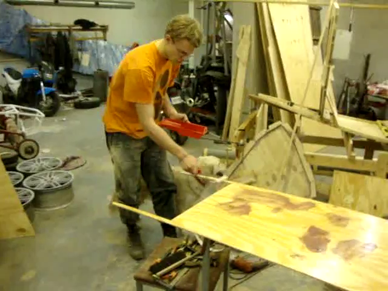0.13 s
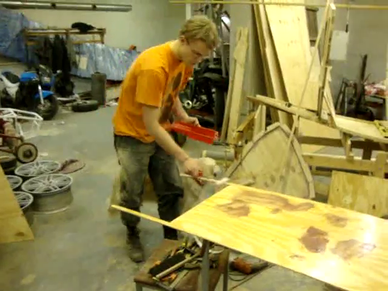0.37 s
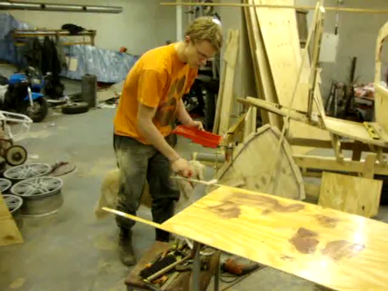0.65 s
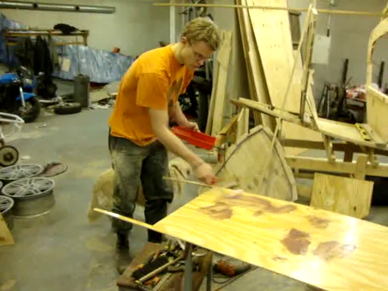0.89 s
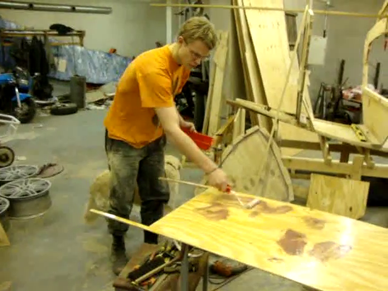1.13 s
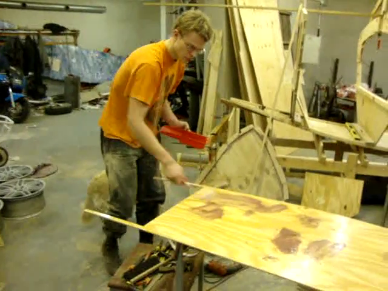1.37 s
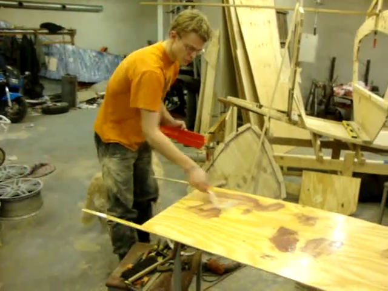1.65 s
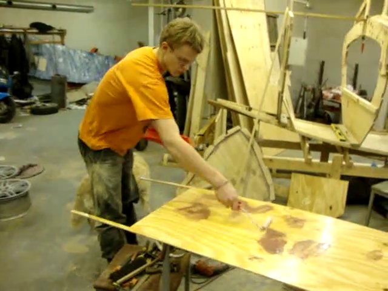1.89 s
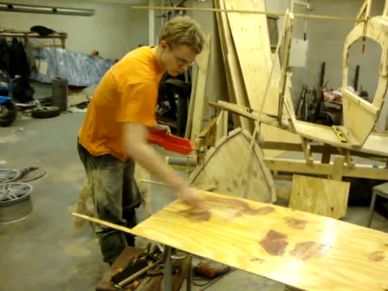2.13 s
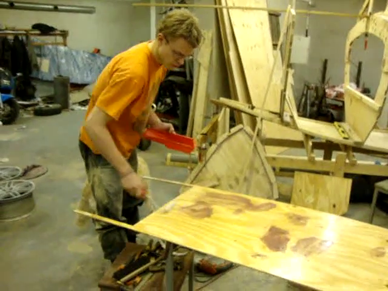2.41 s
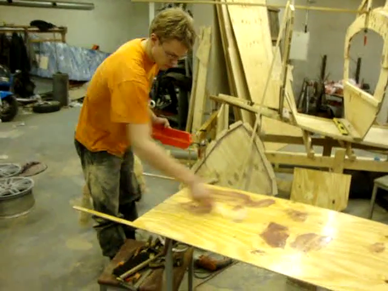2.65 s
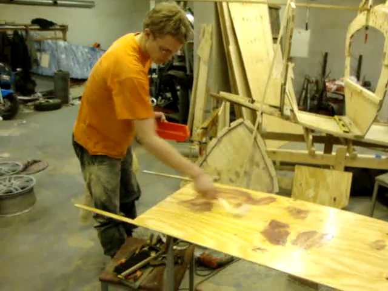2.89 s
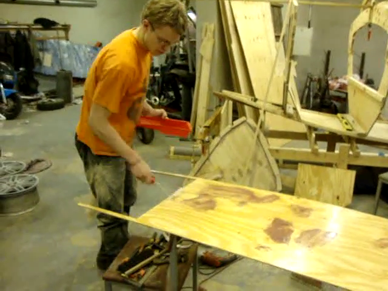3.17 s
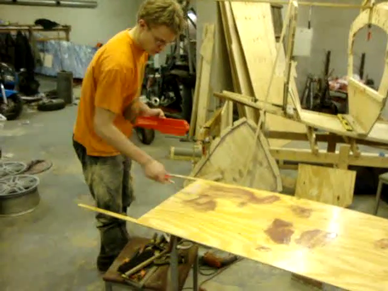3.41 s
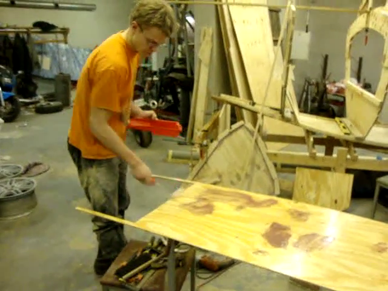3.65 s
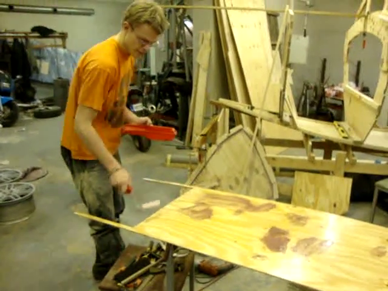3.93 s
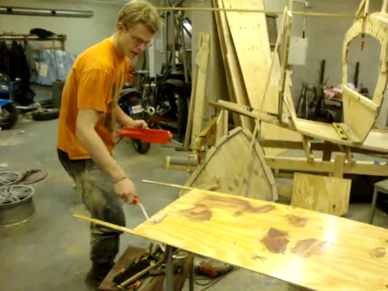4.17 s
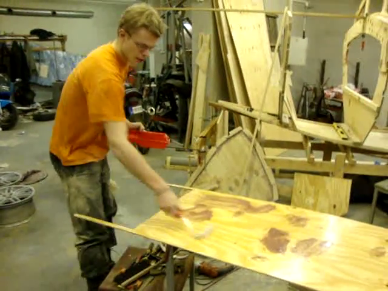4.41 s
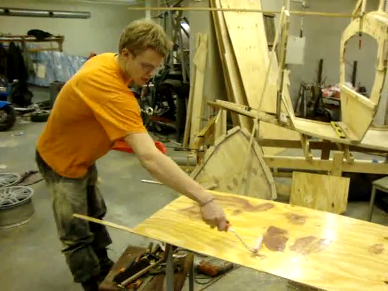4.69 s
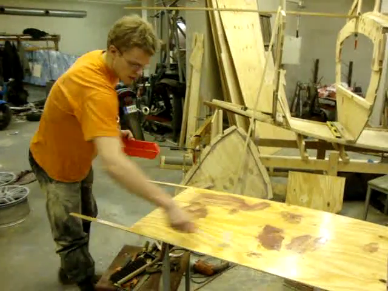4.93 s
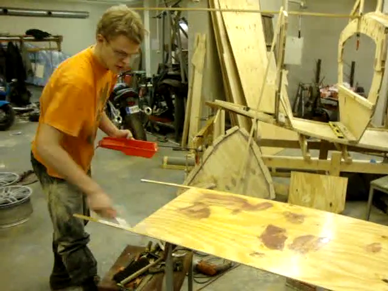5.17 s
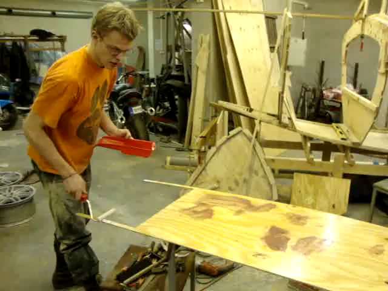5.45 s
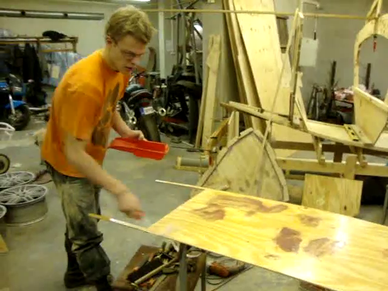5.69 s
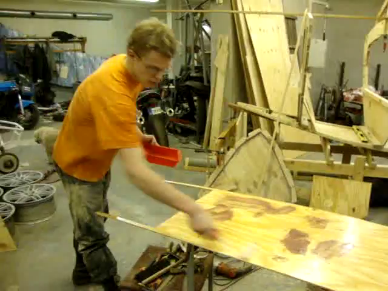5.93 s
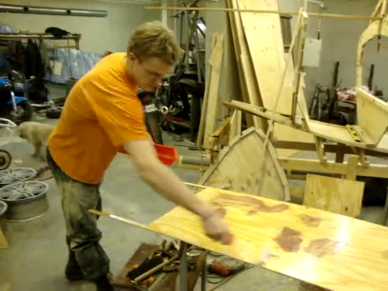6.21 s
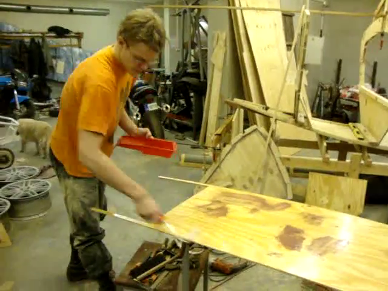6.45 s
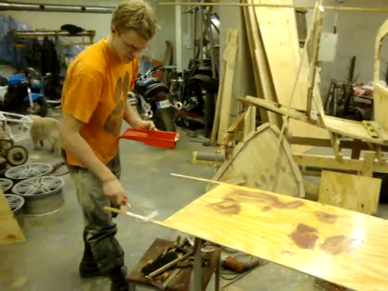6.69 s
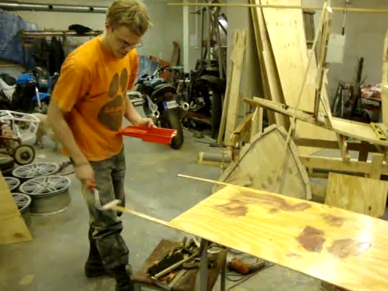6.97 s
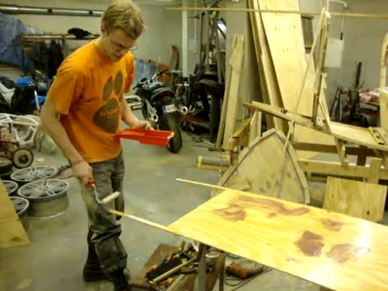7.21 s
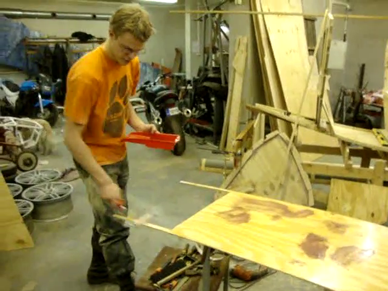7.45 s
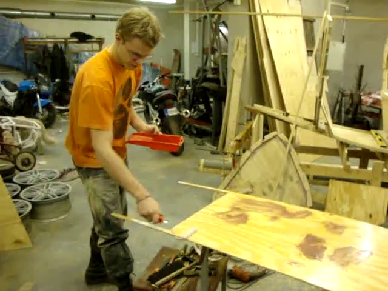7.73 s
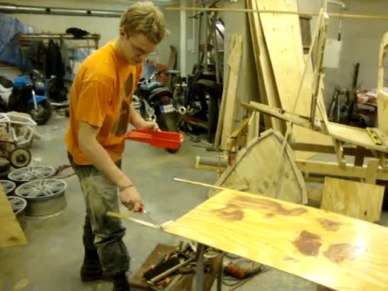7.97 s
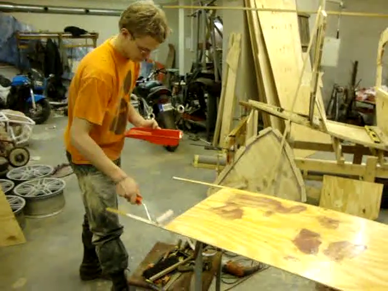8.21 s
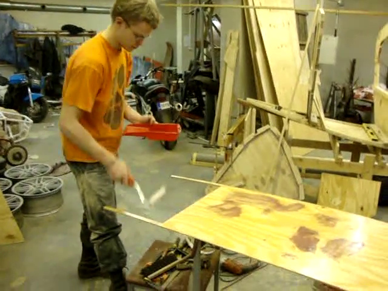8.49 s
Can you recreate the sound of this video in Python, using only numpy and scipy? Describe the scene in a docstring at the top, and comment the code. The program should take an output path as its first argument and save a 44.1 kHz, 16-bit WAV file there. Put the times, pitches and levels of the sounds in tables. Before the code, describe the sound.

A handheld microphone a few steps away picks up a tacky roller on a resonant wooden panel: arching swishes of fine sticky crackle, nap scuffing, and hollow board rumble. Clicks open the scene, a bouncing knock interrupts halfway, and soft knocks and a brief rattle follow. Near the end come a longer rattle, weak strokes, heavy double knocks and a low trestle shudder in the echoing hall.

```python
"""A small paint roller spreads sticky epoxy over a plywood panel in a large workshop, over steady room noise.
Two hard clicks come first; then strokes grow stronger: the nap hisses out of the resin, the panel rumbles.
A knock booms and bounces halfway, then more strokes follow among soft knocks, clicks and a rattle.
Late on a longer rattle sounds, the strokes weaken, and heavy knocks with clicks leave a low shudder.
Shaped noise makes strokes and room, ringing modes the knocks, short sines the clicks; the hall answers them."""
import sys
import numpy as np
from scipy import signal
from scipy.fft import rfft, irfft, next_fast_len
from scipy.io import wavfile
from scipy.ndimage import uniform_filter1d, map_coordinates

SR = 44100
rng = np.random.default_rng(int(sys.argv[2]) if len(sys.argv) > 2 else 0)


def transcribe(signal):
    """Save signal, clipped to [-1, 1], as a 16-bit WAV file at the path in sys.argv[1]."""
    frames = np.atleast_2d(signal).T
    limited = np.clip(frames, -1, 1)
    pcm = np.round(limited * 32767).astype(np.int16)
    wavfile.write(sys.argv[1], SR, pcm)


def to_linear_factor(level_db):
    """Convert decibel levels (scalar or array-like) to linear amplitude factors."""
    exponent = np.asarray(level_db, float) / 20
    return 10 ** exponent


N = 379260  # length in samples


def unit(x):
    """Scales a sound to rms 1."""
    return x / np.sqrt(np.mean(x ** 2) + 1e-20)


def along(points, hz):
    """Reads a curve of (Hz, value) points on a log frequency axis."""
    f, v = np.transpose(points)
    return np.interp(np.log(hz + 1), np.log(f + 1), v)


def filtered(x, response):
    """Multiplies the spectrum of x by a response, a function of frequency in Hz."""
    m = next_fast_len(len(x) + 8192)
    hz = np.fft.rfftfreq(m, 1 / SR)
    return irfft(rfft(x, m) * response(hz), m)[:len(x)]


def coloured(x, spectrum):
    """Filters x by a table of (Hz, dB) and scales it to rms 1."""
    return unit(filtered(x, lambda hz: to_linear_factor(along(spectrum, hz))))


def wobble(rate):
    """A smooth random curve with so many random knots a second."""
    knots = rng.standard_normal(int(N * rate / SR) + 4)
    return map_coordinates(knots, [np.arange(N) * rate / SR])


def crackle(spread_db):
    """Dense tiny snaps: noise whose samples have widely spread sizes."""
    return rng.standard_normal(N) * to_linear_factor(spread_db * rng.standard_normal(N))


def patchy(x, depth_db):
    """Makes x stronger and weaker in random patches of time and frequency."""
    z = signal.stft(x, nperseg=512)[2]
    field = uniform_filter1d(rng.standard_normal(z.shape), size=14, axis=0)
    field = uniform_filter1d(field, size=5, axis=1)
    return signal.istft(z * to_linear_factor(depth_db * unit(field)), nperseg=512)[1][:N]


# The roller's strokes over the panel.
# Each row: start in seconds, length in seconds, share of the length until the fastest point,
# speed as a level in dB, pressure as a level in dB.
STROKES = [(-.35, .6, 0.62, -54, -52), (0.668, 0.46, 0.6, -51.5, -49.5), (1.151, 0.31, 0.62, -41, -45),
           (1.503, 0.52, 0.44, -40.5, -41), (1.997, 0.44, 0.54, -35.5, -37.5),
           (2.444, 0.4, .45, -37.5, -38.5), (2.849, 0.4, 0.44, -33, -36), (3.518, 0.23, 0.46, -39.5, -45),
           (4.08, 0.78, 0.55, -42, -46), (4.789, 0.29, .04, -44.5, -44), (4.795, 0.57, 0.51, -39.5, -41),
           (5.64, 0.18, 0.092, -50, -47), (5.629, 0.56, 0.5, -43, -45.5), (6.155, 0.62, 0.42, -41, -46.5),
           (6.697, 0.46, 0.27, -54.5, -51.5), (7.367, 0.44, 0.61, -49.5, -51.5),
           (7.814, 0.14, 0.23, -41.5, -52.5), (7.937, 0.4, 0.45, -52.5, -47.5)]


def arch(swell, levels_db, rest_db):
    """Gain over time: every stroke speeds up and slows down in one arch, over a faint steady bed."""
    t = np.arange(N) / SR
    power = np.full(N, to_linear_factor(2 * rest_db))
    for (start, length, peak, *_), db in zip(STROKES, levels_db):
        span = slice(max(round(start * SR), 0), round((start + length) * SR))
        u = np.clip((t[span] - start) / length, 0, 1)
        peak = np.clip(peak, .03, .9)
        rise_and_fall = np.minimum(u / peak, (1 - u) / (1 - peak))
        power[span] += to_linear_factor(2 * db) * np.sin(np.pi / 2 * rise_and_fall) ** (2 * swell)
    return np.sqrt(power)


def roller():
    """Resin threads snap off the nap, the nap scuffs the wood, and the rolling shakes panel and trestles."""
    speed_db, pressure_db = np.transpose(STROKES)[3:]
    uneven = wobble(32)  # the roller does not turn quite true
    return (hiss(speed_db, uneven) + scuff(speed_db, pressure_db, uneven)
            + rumble(pressure_db, uneven) + shudder(pressure_db))


# Tone of the peeling resin. Each row: frequency in Hz, relative level in dB.
HISS = [(1760, -37), (3000, -0.5), (3190, -6), (3520, 0), (4630, 5), (6640, 1), (7920, 3), (9150, 2),
        (9780, 2), (10300, -18.5), (13400, -85), (22000, -120)]


def hiss(speed_db, uneven):
    """Resin threads snap off the nap in a dense crackle that follows the speed."""
    snaps = coloured(patchy(crackle(spread_db=5.0), depth_db=1.46), HISS)
    flutter = to_linear_factor(0.92 * uneven + 1.3 * wobble(120))
    return arch(1.21, speed_db, rest_db=-61) * flutter * snaps


# Tone of the nap on the wood. Each row: frequency in Hz, relative level in dB.
SCUFF = [(590, -26), (1000, -1), (1430, -3), (1870, -0.5), (2650, -1), (3210, -3.5), (4200, -7.5),
         (5460, -52), (9240, -120)]


def scuff(speed_db, pressure_db, uneven):
    """The nap scuffs the wood, driven by both speed and pressure."""
    speed_share = 0.42
    level_db = -3 + speed_share * speed_db + (1 - speed_share) * pressure_db
    rub = coloured(patchy(crackle(spread_db=3), depth_db=2.0), SCUFF)
    flutter = to_linear_factor(0.25 * uneven + 0.27 * wobble(40))
    return arch(1.17, level_db, rest_db=-59) * flutter * rub


# Tones at which the plywood panel rings.
# Each row: frequency in Hz, width of the resonance in Hz, relative level in dB.
PANEL = [(140, 21, -9), (171, 13, -11.5), (230.4, 7.4, 3), (292.6, 96, 3), (350, 43, 5.5), (420, 72, 2.5),
         (509, 31, 6), (601, 57, -2), (688.4, 29.5, 2), (778, 37, 2.5), (853.6, 29, 2.5), (938, 55, -1),
         (1037, 56, -3.5), (1224, 135, -6.5), (1920, 320, -20), (2220, 330, -29), (2580, 120, -19)]


def panel(x, strike_db, sides):
    """The panel rings at its modes, each as strongly, and to the side, that the place of contact gives."""
    def response(f):
        total = 0
        for (hz, width, db), extra_db, side in zip(PANEL, strike_db, sides):
            total = total + side * to_linear_factor(db + extra_db) * hz * width / (hz * hz - f * f + 1j * f * width)
        return total
    return filtered(x, response)


def rumble(pressure_db, uneven):
    """Rolling keeps the panel's modes ringing with noise, stronger under pressure."""
    modes = np.arange(len(PANEL))
    ringing = unit(panel(rng.standard_normal(N), 0.0 * modes, (-1) ** modes))  # alternate sides
    flutter = to_linear_factor(1.2 * uneven + 1.2 * wobble(12))
    return arch(1.41, pressure_db, rest_db=-65.5) * flutter * ringing


# Tone of the shaking trestles. Each row: frequency in Hz, relative level in dB.
SHUDDER = [(90, -29), (115, -2.5), (135, 5), (165, 5), (200, 2.5), (260, -44)]
# Jolts to the trestles. Each row: start in seconds, level in dB, time to fade by 60 dB in seconds.
JOLTS = [(4.098, -64, 0.71), (5.7, -67, 2), (7.1, -55, 4.1), (8.12, -49.5, 3.6)]


def shudder(pressure_db):
    """The trestles shake low under each stroke, and go on shuddering after a jolt."""
    t = np.arange(N) / SR
    jolts = sum(to_linear_factor(db - 60 * np.abs(t - start) / t60) * (t > start) for start, db, t60 in JOLTS)
    shaking = to_linear_factor(1.8 * wobble(3.7)) * coloured(rng.standard_normal(N), SHUDDER)
    return (arch(3.8, pressure_db - 19.5, rest_db=-70) + jolts) * shaking


# Knocks of the roller on the panel.
# Each row: start in seconds, rms level in dB over a quarter second, favoured pitch in Hz,
# focus on that pitch in dB per octave, number of rebounds (rounded; below zero means none).
KNOCKS = [(3.528, -36.5, 555, 7, 4), (3.829, -61.5, 860, 49, -0.5), (3.9705, -52.5, 860, 46, -0.5),
          (4.101, -52, 157, 26, -0.5), (5.644, -48, 810, 15, 0), (5.655, -48, 266, 17, 0),
          (6.694, -54, 440, -2, 1), (7.061, -52, 149, 19, 0), (7.519, -56, 272, 21, 0),
          (7.936, -55, 350, 19, 0.5), (8.0905, -34.5, 560, 7.5, 0), (8.098, -34.5, 780, 6, 4),
          (8.192, -31, 368, 11.5, 2.5)]
# A hard knock lands again, lower in pitch.
# Each row: delay after the knock in seconds, level against the knock in dB, pitch as a ratio to the knock's.
REBOUNDS = [(0.0118, -3, 0.61), (.02, -13, 0.6), (.038, -10.5, 0.83), (.068, -7, .75)]


def blows():
    """Every contact with the panel: the knocks and their rebounds."""
    hits = []
    for start, db, hz, focus_db, count in KNOCKS:
        landings = [(0, 0, 1), *REBOUNDS][:round(count) + 1]
        for delay, change_db, ratio in landings:
            hits.append((start + delay, db + change_db, hz * ratio, focus_db))
    return hits


def knocks():
    """A short soft push favours the modes near one pitch; every blow lands on another spot."""
    out, push = np.zeros(N + SR), np.zeros(SR // 4)
    push[:24] = np.hanning(24)
    mode_hz = np.transpose(PANEL)[0]
    for start, db, pitch_hz, focus_db in blows():
        spot, side = rng.standard_normal((2, len(PANEL)))
        octaves_away = np.abs(np.log2(mode_hz / pitch_hz))
        ring = panel(push, 1.5 * spot - focus_db * octaves_away, np.sign(side))
        out[round(start * SR):][:len(ring)] += to_linear_factor(db) * unit(ring)
    return out[:N]


# Single hard clicks.
# Each row: start in seconds, peak level in dB, pitch in Hz, cycles until the peak,
# level sent to the hall against the direct click in dB.
CLICKS = [(.2697, -19, 2460, 0.81, 1.5), (.2764, -20.5, 2870, 1.02, 1), (3.5295, -32.5, 2200, 1.1, 7.5),
          (3.715, -30, 1740, 1.5, 3), (4.3832, -27, 4996, 2.2, 9.5), (4.7932, -23.5, 3500, 0.82, 4.5),
          (5.6476, -17.5, 2115, 1.4, 1.5), (7.0227, -27.5, 1830, 0.65, 7.5), (7.995, -38, 2480, 2.4, 8),
          (8.097, -26.5, 1880, 1.7, 5), (8.193, -21, 2420, 1.5, 2), (8.21, -25, 2690, 1.5, 1)]
# Rattles, quick runs of clicks that swell and fade.
# Each row: start in seconds, number of clicks, loudest peak level in dB, pitch in Hz,
# level sent to the hall against the direct clicks in dB.
RATTLES = [(4.396, 5, -23.5, 990, -2), (7.0453, 7, -18, 2340, -3.5)]


def taps():
    """Every click, the single ones and those of the rattles, which fall unevenly."""
    gap_s, scatter = .0068, .1  # scatter: share of the gap, and of the pitch
    loudest_at, fade_db = 0.39, 1.1  # share of the run; loss per squared step away
    events = list(CLICKS)
    for start, count, db, hz, echo_db in RATTLES:
        for k in range(round(count)):
            late, sharp = rng.standard_normal(2)
            steps_away = k - (count - 1) * loudest_at
            events.append((start + (k + scatter * late) * gap_s, db - fade_db * steps_away ** 2,
                           hz * (1 + scatter * sharp), 0.86, echo_db))
    return events


def clicks():
    """A few cycles swell and die, roughened by a crack; rows: direct sound, sound sent to the hall."""
    out, t = np.zeros((2, N + SR)), np.arange(SR // 50) / SR
    for start, db, hz, cycles, echo_db in taps():
        crack = uniform_filter1d(rng.standard_normal(len(t)), size=4)
        phase = 2 * np.pi * hz * t
        lower, higher = 0.44 * np.sin(0.64 * phase), 0.42 * np.sin(1.49 * phase)
        age = t * hz / cycles  # 1 at the peak
        ring = (np.sin(phase) + lower + higher + .35 * crack) * (age * np.exp(-age)) ** 2
        gains = to_linear_factor(np.array([[db], [db + echo_db]]))
        out[:, round(start * SR):][:, :len(t)] += gains * ring / np.abs(ring).max()
    return out[:, :N]


# How long the hall rings. Each row: frequency in Hz, time to fade by 60 dB in seconds.
HALL = [(150, 0.87), (600, 0.82), (2000, 0.84), (5000, 0.63), (10000, 0.17)]


def hall(x, gap_s, near):
    """Each frequency of the hall's answer dies at its own speed; nearby timber answers first and strongest."""
    hz, t, z = signal.stft(rng.standard_normal(SR), SR, nperseg=256)
    fade = to_linear_factor(-60 * t / along(HALL, hz)[:, None])
    tail = signal.istft(z * fade, SR, nperseg=256)[1]
    tail = tail * (1 + near * np.exp(-np.arange(len(tail)) / SR / .03))  # the timber, gone within 0.1 s or so
    delayed = np.pad(x, (round(gap_s * SR), 0))
    return signal.fftconvolve(delayed, tail / np.linalg.norm(tail))[:N]


# Tone of the room noise. Each row: frequency in Hz, relative level in dB.
AIR = [(15, -65.5), (25, -19), (75, -12), (145, -24), (300, -0.5), (449, 1), (496, 3), (592, -4),
       (978, -1.5), (1460, -8), (2740, -16.5), (5810, -15), (9370, -37), (10100, -29.5), (13100, -51),
       (22000, -120)]


def room_noise():
    """Steady coloured noise whose level wavers very slightly."""
    return to_linear_factor(-54 + 0.22 * wobble(14.0)) * coloured(rng.standard_normal(N), AIR)


def scene():
    """The work, its echo in the hall, and the room noise."""
    strokes, booms = roller(), knocks()
    ticks, far_ticks = clicks()
    echo = to_linear_factor(-10) * hall(strokes, .012, near=0.11)
    echo += to_linear_factor(-4.5) * hall(booms, 0.00733, near=0.1)
    echo += to_linear_factor(-0.5) * hall(far_ticks, 0.001487, near=0.98)
    work = strokes + booms + ticks + echo
    low_cut = signal.butter(8, 116, "high", fs=SR, output="sos")
    thin = signal.sosfilt(low_cut, work)  # the small microphone drops the deep bass steeply
    return (thin + room_noise())[None]


def top_cut(x):
    """Nothing passes above the cut-off."""
    return signal.sosfilt(signal.butter(12, 10740, fs=SR, output="sos"), x)


def record(dry):
    """The recorder's band limit removes everything from 10200 Hz up."""
    limited = filtered(dry[0], lambda hz: hz < 10200)
    return top_cut(limited[None])


dry = scene()
out = record(dry)
transcribe(out)
```